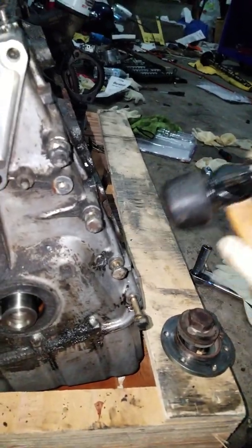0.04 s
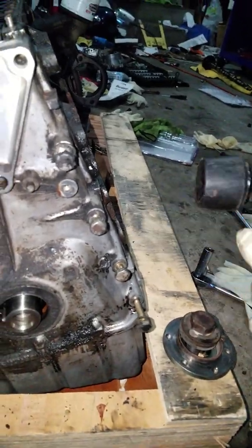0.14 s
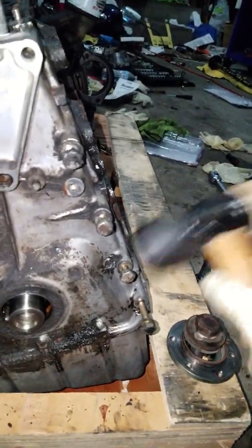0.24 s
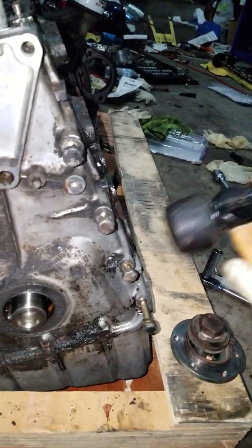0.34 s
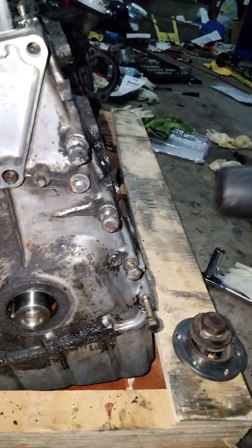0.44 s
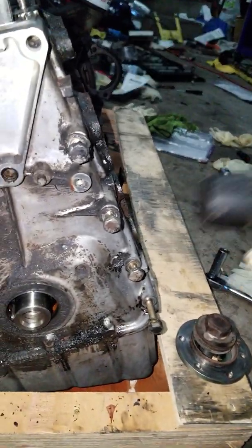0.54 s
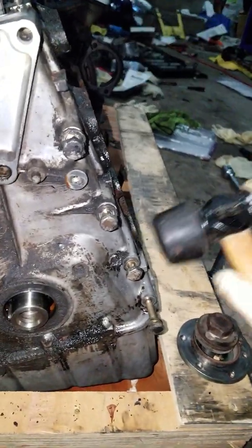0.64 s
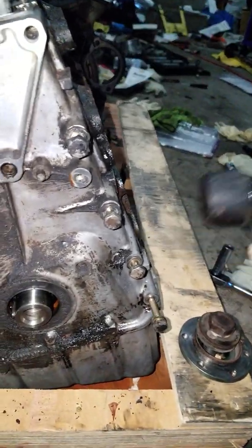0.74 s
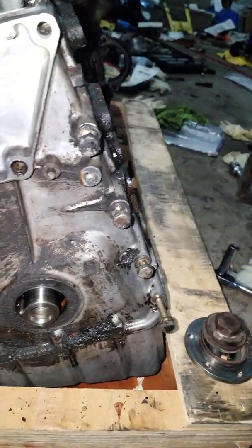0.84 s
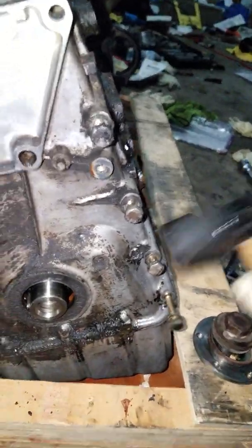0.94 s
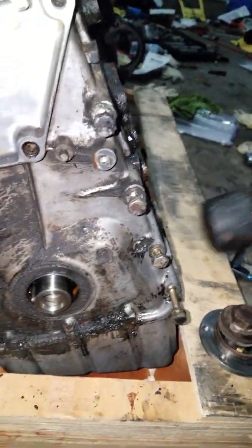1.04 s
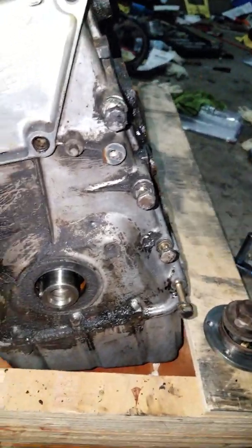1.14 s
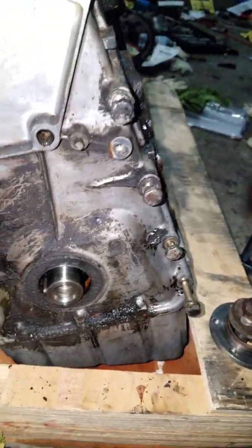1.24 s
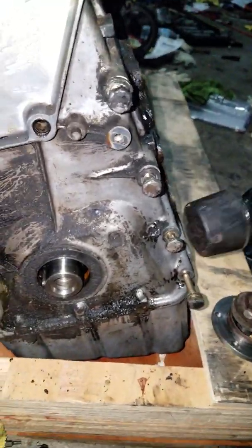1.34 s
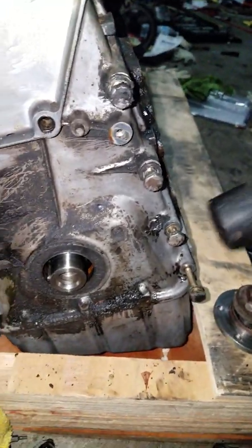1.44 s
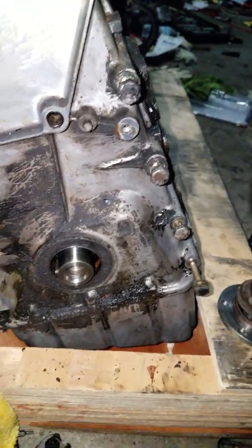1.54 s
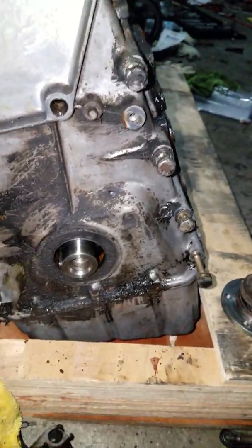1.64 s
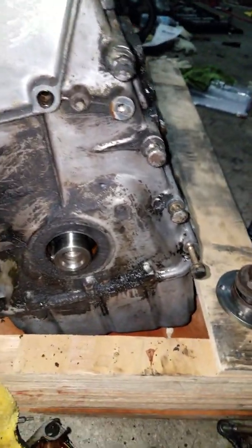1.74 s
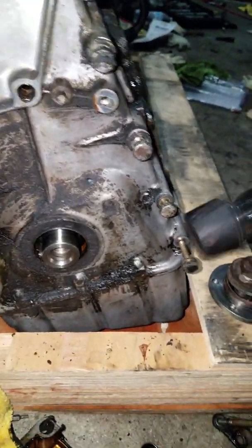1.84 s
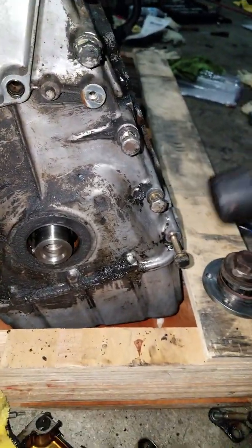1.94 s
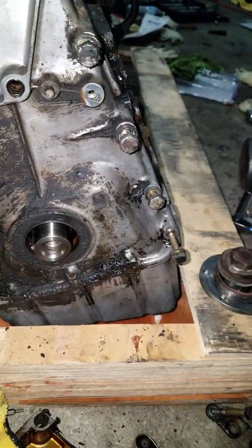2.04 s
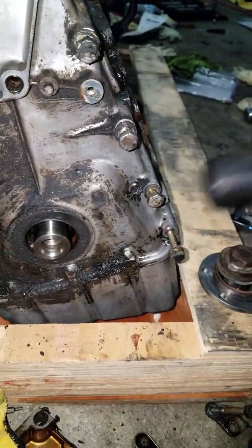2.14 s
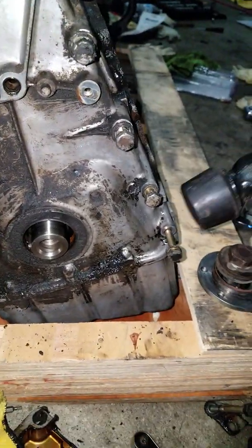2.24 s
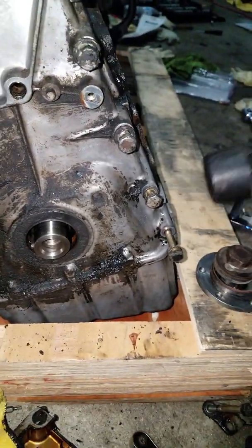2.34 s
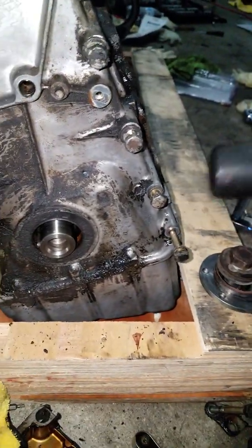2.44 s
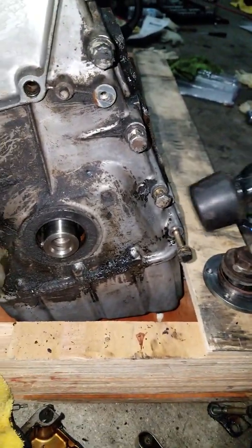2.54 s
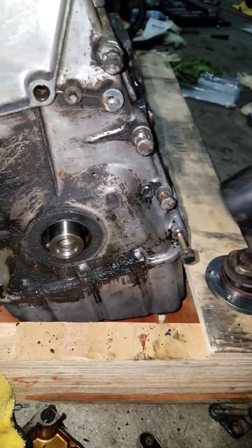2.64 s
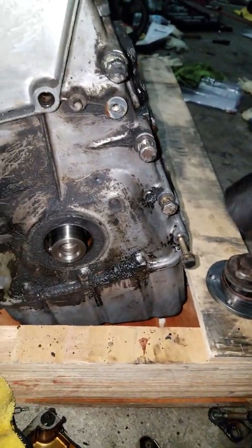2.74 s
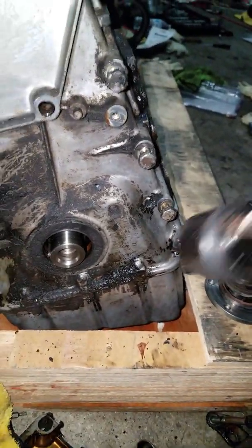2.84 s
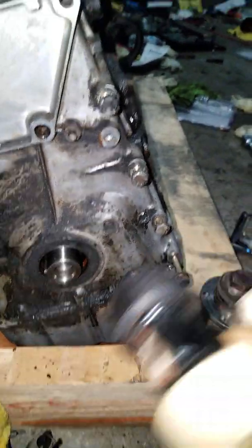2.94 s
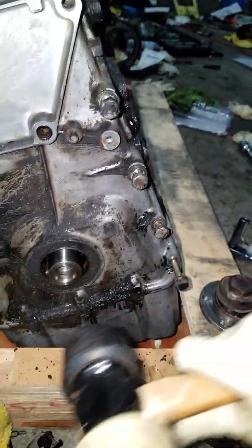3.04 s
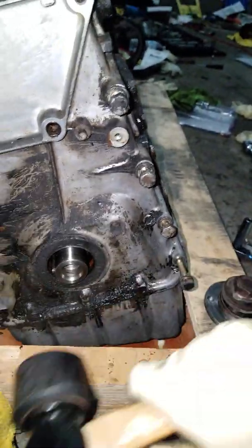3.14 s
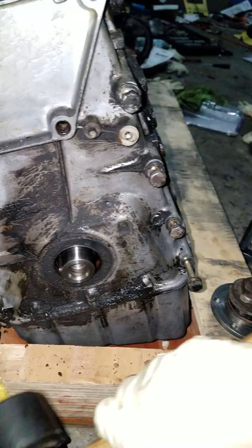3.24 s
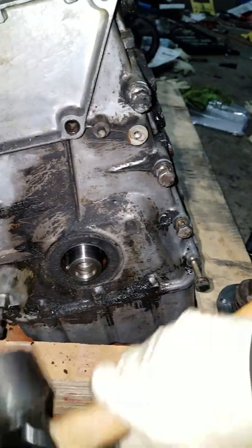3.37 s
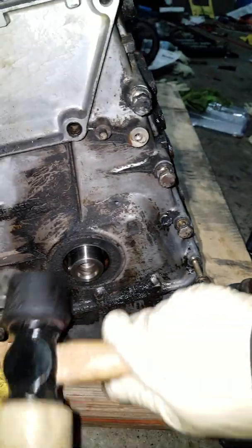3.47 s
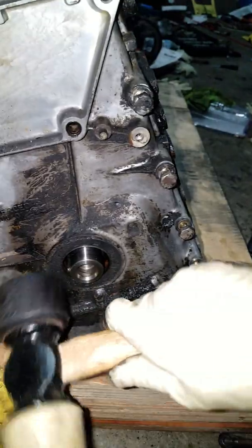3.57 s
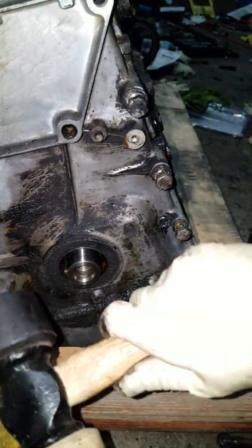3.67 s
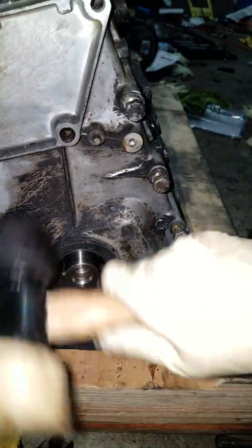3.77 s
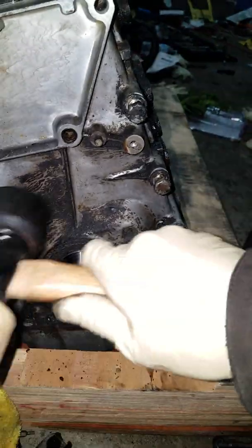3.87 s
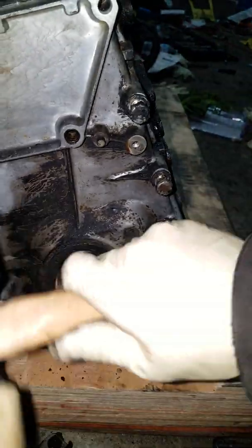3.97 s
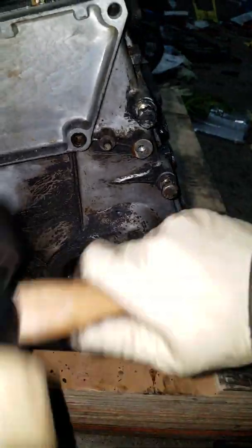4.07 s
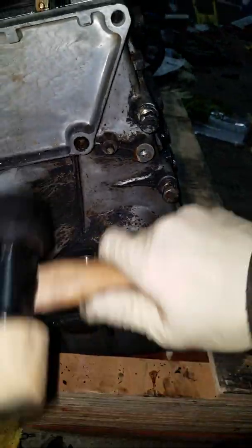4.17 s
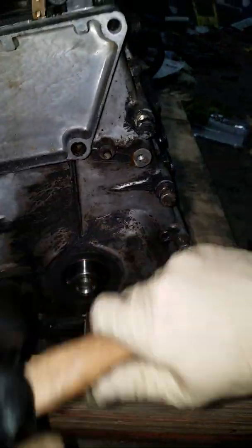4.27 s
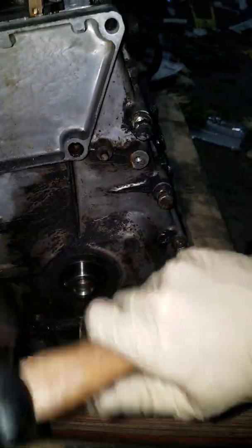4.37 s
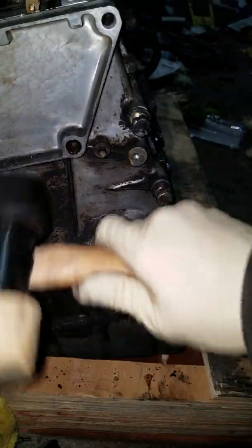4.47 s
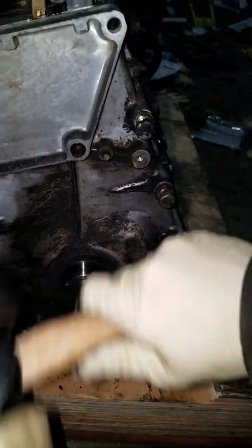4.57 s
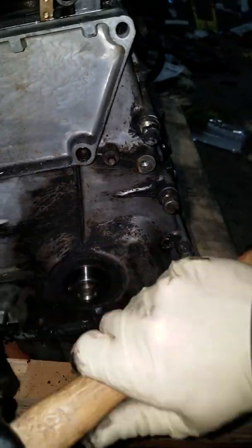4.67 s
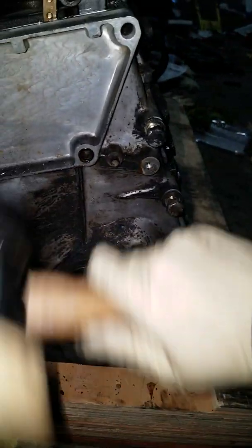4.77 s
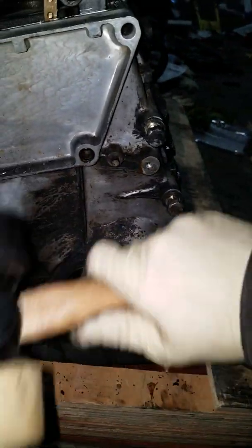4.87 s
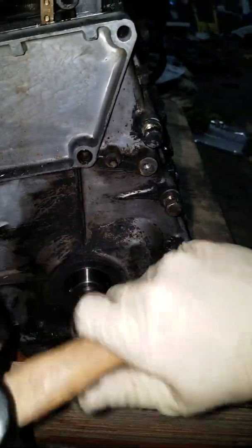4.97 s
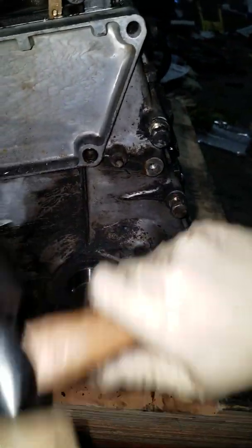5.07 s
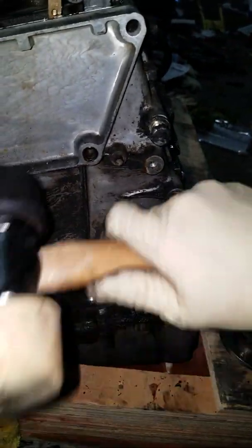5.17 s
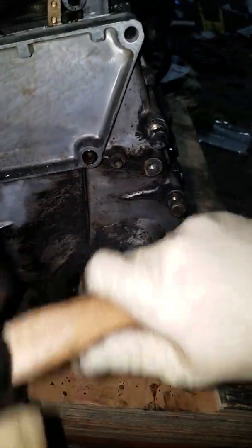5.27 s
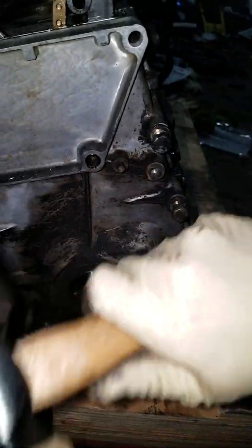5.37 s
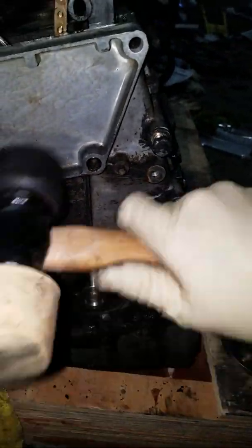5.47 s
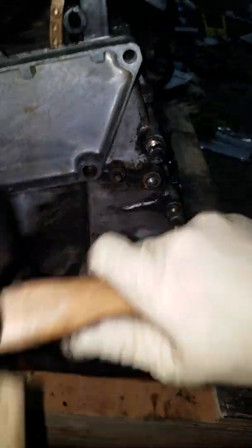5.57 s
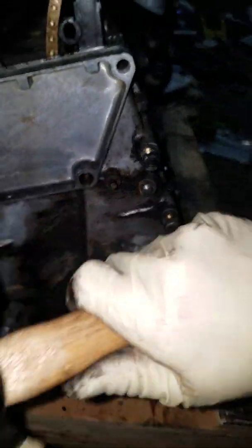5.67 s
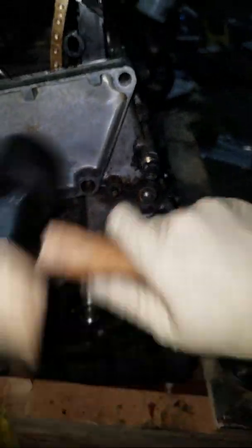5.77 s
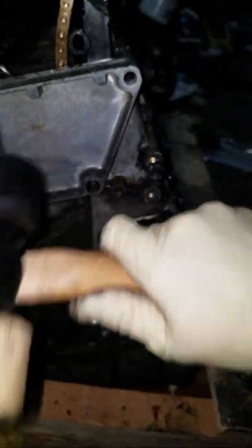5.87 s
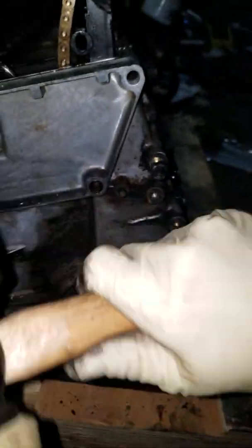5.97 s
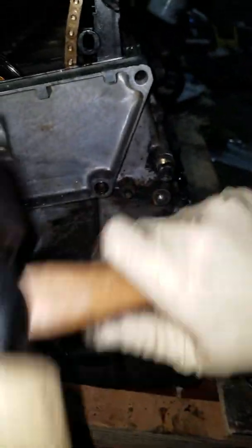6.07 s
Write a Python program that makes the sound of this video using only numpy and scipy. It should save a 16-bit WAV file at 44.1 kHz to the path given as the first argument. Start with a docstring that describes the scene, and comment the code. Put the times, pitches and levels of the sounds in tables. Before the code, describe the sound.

In a cluttered garage, a rubber mallet strikes the side of a heavy engine on timber: seven dull, hollow knocks about a third of a second apart, the fourth weaker, with faint rim ticks. After a pause of over a second, seven sharper, drier knocks land on the front cover, close to the microphone. Low room rumble and steady hiss sit underneath, with a distant vehicle slowly nearing.

```python
"""Mallet on an engine cover

In a garage, a rubber mallet taps the cast metal cover of an engine that rests on timber.
Seven dull knocks land on the side of the cover, then seven sharper ones on its front, close to the microphone.
Each knock is a slap of noise, ringing cover modes and a shove of the heavy block, with the echoes of the room.
Behind them, shaped noise makes a low room rumble, microphone hiss and a distant vehicle that draws near."""
import sys
import numpy as np
from scipy import signal
from scipy.fft import rfft, irfft
from scipy.io import wavfile

SR = 44100
rng = np.random.default_rng(int(sys.argv[2]) if len(sys.argv) > 2 else 0)


def put_to_file(sound):
    """Save the sound as 16-bit audio at rate SR, in the file named by the first command-line argument."""
    columns = np.atleast_2d(sound).T  # one column per channel
    safe = np.clip(columns, -1, 1)
    whole_steps = np.round(safe * 32767)
    wavfile.write(sys.argv[1], SR, whole_steps.astype(np.int16))


N = 269230

# Spectrum of the room rumble: (frequency [Hz], relative level per Hz [dB])
RUMBLE_SPECTRUM = [(20, -5), (40, -11), (62, 4), (110, 3), (160, 1), (240, -2.5), (380, -10), (600, -11.5),
                   (900, -10), (1300, -25), (2200, -25.5), (4000, -31), (9000, -46)]
# Spectrum of the distant vehicle: (frequency [Hz], relative level per Hz [dB])
VEHICLE_SPECTRUM = [(100, -38), (200, -3), (305, 4.5), (390, -5), (470, -3), (600, -9), (760, -7.5),
                    (1400, -22), (3000, -28), (8000, -76)]
# Spectrum of the microphone hiss: (frequency [Hz], relative level per Hz [dB])
HISS_SPECTRUM = [(100, -31.5), (1000, -5.5), (2400, -8), (3500, -11), (5000, -8.5), (7200, -6.5),
                 (8700, -14), (10500, -7.5), (12800, -0.5), (15800, 1)]
# Hiss of the right port against the left: (frequency [Hz], gain [dB])
HISS_RIGHT_RESPONSE = [(1000, -2.5), (4000, -13.5), (8000, -31), (11000, -24.5), (15000, -14)]
# Likeness of the two ports in room sound: (frequency [Hz], coherence [0-1])
PORT_COHERENCE = [(60, 0.98), (250, 0.91), (600, 0.53), (1200, 0.061), (3000, 0.04)]
# Decay of the garage tail: (frequency [Hz], t60 [s])
GARAGE_DECAY = [(100, 0.4), (260, 0.37), (700, 0.23), (1840, 0.42), (3500, 0.33), (8000, .08)]
# Strength of the garage tail: (frequency [Hz], gain [dB])
GARAGE_SEND = [(80, -0.5), (200, -4), (400, 2), (1000, -8.5), (2000, -9), (4000, -12), (9000, -18)]
# Echoes off floor and bench: (nominal delay [s], gain [dB])
NEAR_ECHOES = [(.0031, -15.5), (.0056, -13), (.0093, -26), (0.0139, -29)]
# Response of the right port, which faces away: (frequency [Hz], gain [dB])
FAR_PORT_RESPONSE = [(100, 7), (250, 4), (600, 2.5), (1100, -3.5), (2000, 6), (3500, -17), (7000, -17.5),
                     (15000, -15.5)]
# The heavy block on its timber: (frequency [Hz], t60 [s], struck on side [dB], struck on front [dB])
BLOCK_MODES = [(63.5, 0.39, -57, -43.5), (102, 0.076, -57, -29.5), (143.2, 0.067, -24, -30),
               (179.7, 0.24, -35.5, -38.5), (206, 0.096, -24, -32.5), (255, 0.31, -45.5, -61),
               (280.4, 0.3, -40, -78)]
# The cast cover, damped by its gasket: (frequency [Hz], t60 [s], struck on side [dB], struck on front [dB])
COVER_MODES = [(443, 0.21, -43, -39), (547, 0.029, -30, -20), (665, 0.026, -33, -23.5),
               (811, 0.046, -25.5, -27.5), (1013, 0.041, -15.5, -69), (1075, 0.053, -20.5, -23),
               (1243, 0.025, -25, -12), (1534, 0.015, -24.5, -14.5), (1634, 0.011, -39, -13),
               (1780, 0.022, -45, -19.5), (2103, 0.011, -20.5, -11.5), (2260, 0.014, -27, -10),
               (2785, 0.0082, -27, -9.5), (3100, 0.011, -25, -28), (4120, 0.0096, -32, -33),
               (5530, 0.013, -39, -25)]
# Crowded modes of ribs and bolts: (frequency [Hz], relative level [dB])
CLATTER_SPECTRUM = [(150, -52), (400, -2), (900, -6.5), (1400, 1), (2600, 6.5), (4000, -3), (7000, -7.5),
                    (12000, -23)]
# Mallet head grazing the rim: (time [s], relative level [dB], contact scale [ms])
RIM_TICKS = [(0.6097, -13, 0.12), (0.9593, -14, 0.079), (1.2897, -0.5, 0.62), (2.4886, -4.5, 0.38)]
# Mallet blows: (time [s], force [dB], contact scale [ms], thud of the block [dB], thin panel [dB])
BLOWS = [(0.2489, 1, 0.36, 0.5, -1), (0.5959, -0.5, 0.42, 1.5, 0), (0.943, 0, 0.46, -0.5, -7),
         (1.2947, -12, 0.41, 14.5, -3), (1.8356, -2.5, 0.51, 2.5, 1), (2.1753, -0.5, 0.44, 3.5, -1.5),
         (2.4897, -4.5, 0.29, 4, 6), (3.815, -8.5, 0.51, 11, 14.5), (4.1400, -7, .23, 5, 0),
         (4.4746, -8, 0.27, 0.5, 3), (4.8129, -2, 0.24, 3.5, -2), (5.1468, 0, 0.31, 1.5, 3),
         (5.4673, -2.5, 0.27, 0.5, 5.5), (5.802, -4, 0.1, 4.5, -1.5)]

# Background; levels are before the small left-right balance of rumble and vehicle
RUMBLE_DB, RUMBLE_WAVER_DB, WAVER_STEP_S = -48, 0.8, 0.406
VEHICLE_START_DB, VEHICLE_RISE_DB_PER_S = -79, 5.5
HISS_DB = -38.5
TOP_EDGE_HZ = 15950  # treble limit of the noises and the recorder

# Blows
TURN_S = 3.2  # blows before this land on the side, later ones on the front
SIDE_PLACE, FRONT_PLACE = 0.072, 0.9  # 0 far side, 1 middle of the front
SIDE_PAN_DB, FRONT_PAN_DB = 3.5, 2.6  # gain of left over right
PANEL_HZ, PANEL_OCTAVES = 1660, 0.28  # centre and width of the modes that the thin panel favours
SHOVE_MS, SHOVE_DOUBLING_DB = 2.21, 9  # shove at 0 dB of thud, and the added thud that doubles its length
SLAP_SHARE = 0.41  # part of the contact in which the face closes on the metal
ROCK_DELAY_S, ROCK_DB, ROCK_CONTACT_MS = 0.064, -13.5, 4.9


def amp(db):
    """Decibels to gain."""
    return 10 ** (np.asarray(db) / 20)


def read(points, hz):
    """Reads a spectrum table on a log-frequency axis."""
    f, value = np.transpose(points)
    return np.interp(np.log(hz + 1), np.log(f + 1), value)


def add(mix, s, sound):
    """Lays a sound into the mix at time s, cut off at its end."""
    part = mix[..., round(s * SR):][..., :sound.shape[-1]]
    part += sound[..., :part.shape[-1]]


def colour(x, points):
    """Causal minimum-phase filter with the given (Hz, dB) response."""
    log_gain = np.log(amp(read(points, abs(np.fft.fftfreq(2048, 1 / SR)))))
    taps = np.fft.ifft(np.exp(np.conj(signal.hilbert(log_gain)))).real
    return signal.fftconvolve(x, taps)[:len(x)]


def fade(t, t60):
    """Exponential decay that falls 60 dB in t60 seconds."""
    return np.exp(-np.log(1000) * t / t60)


def noise(points):
    """Steady noise of rms 1 with the given spectrum, empty above the treble limit."""
    hz = np.fft.rfftfreq(N, 1 / SR)
    spectrum = rfft(rng.standard_normal(N)) * amp(read(points, hz))
    x = irfft(spectrum * (hz < TOP_EDGE_HZ), N)
    return x / x.std()


def diffuse(points):
    """Noise that fills the room: alike at both ports in the bass, nearly unrelated in the treble."""
    same = read(PORT_COHERENCE, np.fft.rfftfreq(N, 1 / SR))
    left, other = noise(points), noise(points)
    right = irfft(same * rfft(left) + np.sqrt(1 - same ** 2) * rfft(other), N)
    return np.array([left, right])


def room_rumble():
    """Low noise filling the garage, steady but for a slight slow waver in level."""
    t = np.arange(N) / SR
    waver = np.interp(t / WAVER_STEP_S, np.arange(N), rng.standard_normal(N))
    return diffuse(RUMBLE_SPECTRUM) * amp(RUMBLE_DB + RUMBLE_WAVER_DB * waver)


def distant_vehicle():
    """Low-pitched noise that grows by a steady number of decibels each second as the vehicle nears."""
    t = np.arange(N) / SR
    return diffuse(VEHICLE_SPECTRUM) * amp(VEHICLE_START_DB + VEHICLE_RISE_DB_PER_S * t)


def microphone_hiss():
    """Steady hiss, independent in each port and mostly in the left one."""
    left = noise(HISS_SPECTRUM)
    right = colour(noise(HISS_SPECTRUM), HISS_RIGHT_RESPONSE)
    return np.array([left, right]) * amp(HISS_DB)


def background():
    """Rumble and vehicle, a little stronger on the right, under the hiss."""
    balance_db = [[-0.6], [0.6]]
    return (room_rumble() + distant_vehicle()) * amp(balance_db) + microphone_hiss()


def garage(x):
    """Near surfaces throw back single echoes; the cluttered room adds a short dense tail."""
    hz, t, z = signal.stft(rng.standard_normal((2, SR // 2)), SR, nperseg=256)
    same = read(PORT_COHERENCE, hz)[:, None]
    z[1] = same * z[0] + np.sqrt(1 - same ** 2) * z[1]
    t60 = read(GARAGE_DECAY, hz)[:, None]
    decay = fade(t, t60) * np.sqrt(2 * np.log(1000) / (t60 * SR))  # unit energy whatever the t60
    build_up = 1 - np.exp(-t / 0.0059)
    send = amp(read(GARAGE_SEND, hz))[:, None]
    tail = signal.istft(z * decay * build_up * send, SR, nperseg=256)[1]
    blur = np.hanning(9) / np.hanning(9).sum()
    for delay_s, db in NEAR_ECHOES:
        add(tail, delay_s * rng.uniform(0.9, 1.1), amp(db) * blur)
    return signal.fftconvolve(x[None], tail, axes=1)


def ports(x, lag_s, pan_db):
    """The right port faces away: it hears the sound duller, and later by the given lag."""
    hz = np.fft.rfftfreq(len(x), 1 / SR)
    delay = np.exp(-2j * np.pi * hz * lag_s)
    right = irfft(rfft(colour(x, FAR_PORT_RESPONSE)) * delay, len(x))
    return np.array([x * amp(pan_db / 2), right * amp(-pan_db / 2)])


def ring(modes, place, panel_db, spread_db, detune):
    """Modes set moving by a push; no two blows land on quite the same spot."""
    t = np.arange(SR // 3) / SR
    hz, t60, side_db, front_db = np.transpose(modes)[:, :, None]
    level, pitch = rng.standard_normal((2, len(modes), 1))
    db = side_db + place * (front_db - side_db) + spread_db * level
    db += panel_db * np.exp(-(np.log2(hz / PANEL_HZ) / PANEL_OCTAVES) ** 2)
    # on the far side, neighbouring modes start in opposite directions, so the knock takes a moment to build
    polarity = (-1 if place < 0.5 else 1) ** np.arange(len(modes))[:, None]
    swing = np.cos(2 * np.pi * hz * (1 + detune * pitch) * t)
    return -np.sum(polarity * amp(db) * fade(t, t60) * swing, 0)


def clatter(db, t60):
    """Ribs and bolts have so many damped modes that they blur into a short burst of noise."""
    t = np.arange(SR // 3) / SR
    burst = colour(rng.standard_normal(len(t)), CLATTER_SPECTRUM)
    return amp(db) * burst / burst.std() * fade(t, t60)


def disperse(x):
    """Bending waves carry treble faster than bass: an all-pass draws the first spike out into a swing."""
    r = np.exp(-2 * np.pi * 350 / SR)
    return signal.lfilter([r, -1], [1, -r], x)


def press(x, contact_ms):
    """The force swells and relaxes while the head touches: a longer contact gives a duller knock."""
    u = np.arange(512) / SR * 1000 / contact_ms
    force = u ** 2 * np.exp(-(u / 0.4) ** 2)
    return np.convolve(x, force / force.sum())[:len(x)]


def rim_ticks():
    """The mallet head grazing the rim gives short bursts of clatter, well to the left."""
    out = np.zeros((2, N))
    for s, db, contact_ms in RIM_TICKS:
        tick = amp(db) * press(clatter(db=-23, t60=0.018), contact_ms)
        add(out, s, ports(tick, lag_s=0, pan_db=14))
    return out


def mallet_blows():
    """Each blow slaps the metal, rings the cover and shoves the block; side blows also rock the block."""
    out = np.zeros((2, N))
    for s, force_db, contact_ms, thud_db, panel_db in BLOWS:
        on_side = s < TURN_S
        place, pan_db = (SIDE_PLACE, SIDE_PAN_DB) if on_side else (FRONT_PLACE, FRONT_PAN_DB)
        cover = ring(COVER_MODES, place, panel_db, spread_db=1.2, detune=0.005)
        block = ring(BLOCK_MODES, place, panel_db=0, spread_db=0.8, detune=0.015)
        metal = press(disperse(cover) + clatter(db=-32.5, t60=0.17), contact_ms)
        # air squeezed from under the rubber face
        slap = press(np.gradient(clatter(db=-17, t60=0.015)), SLAP_SHARE * contact_ms)
        # a heavier thud comes from a longer shove
        shove_ms = SHOVE_MS * 2 ** (thud_db / SHOVE_DOUBLING_DB)
        thud = amp(thud_db) * press(block, shove_ms)
        knock = amp(force_db) * (metal + slap + thud)
        add(out, s, ports(knock, lag_s=0.00001 + 0.00014 * place, pan_db=pan_db))
        add(out, s, amp(-6 * place) * garage(knock))  # the front is nearer, so it sounds drier
        if on_side:
            # pushed sideways, the block tips and drops back on the timber
            rock = amp(force_db + ROCK_DB) * press(block, ROCK_CONTACT_MS)
            add(out, s + ROCK_DELAY_S, rock)
    return out


def scene():
    """The knocks and rim ticks over the background of the garage."""
    return background() + rim_ticks() + mallet_blows()


def record(dry):
    """The recorder cuts the deepest bass and the top of the treble."""
    x = signal.sosfilt(signal.butter(2, 35, "high", fs=SR, output="sos"), dry)
    low_pass = signal.firwin(511, TOP_EDGE_HZ, window=("kaiser", 9), fs=SR)
    return signal.oaconvolve(x, low_pass[None], "same")


dry = scene()
out = record(dry)
put_to_file(out)
```